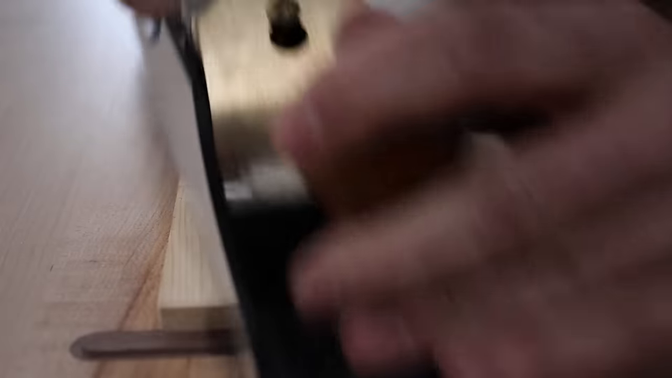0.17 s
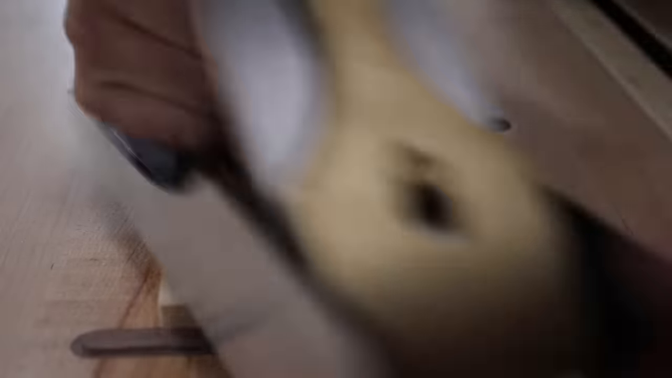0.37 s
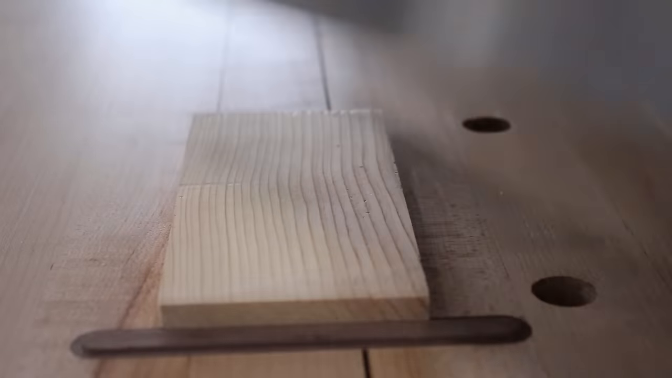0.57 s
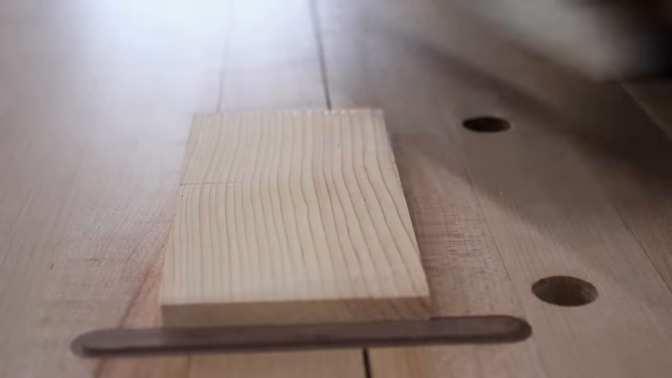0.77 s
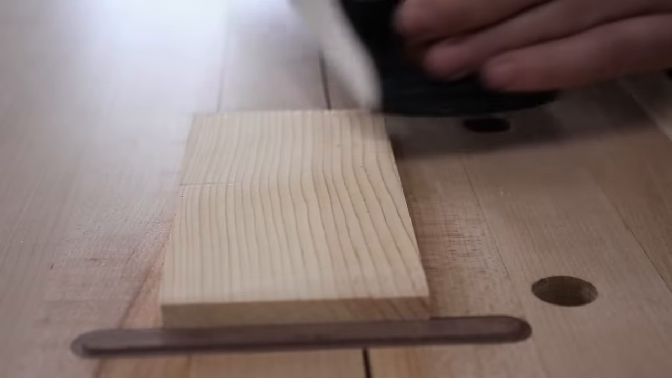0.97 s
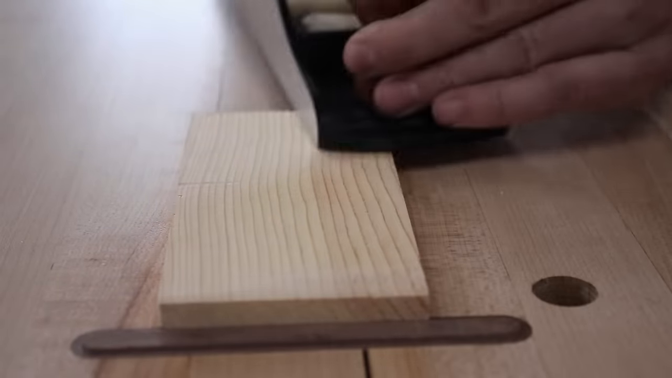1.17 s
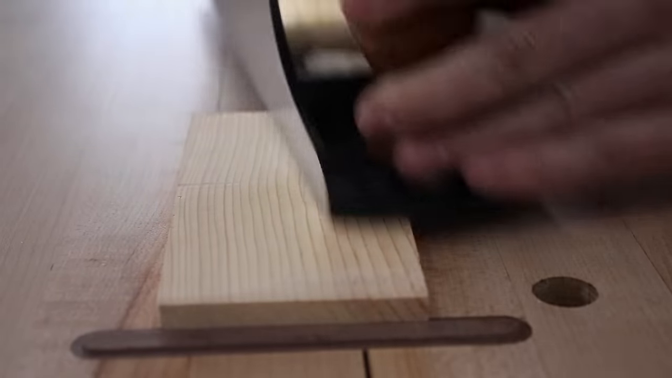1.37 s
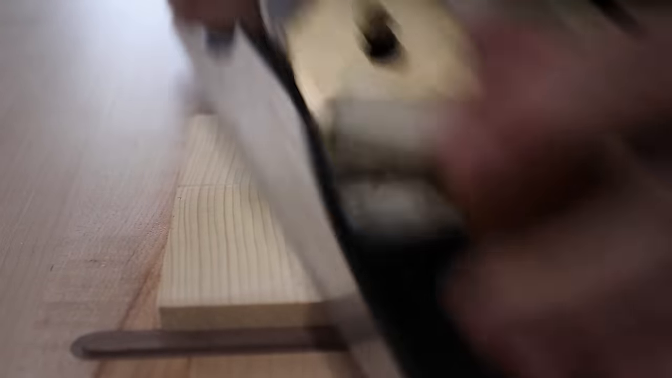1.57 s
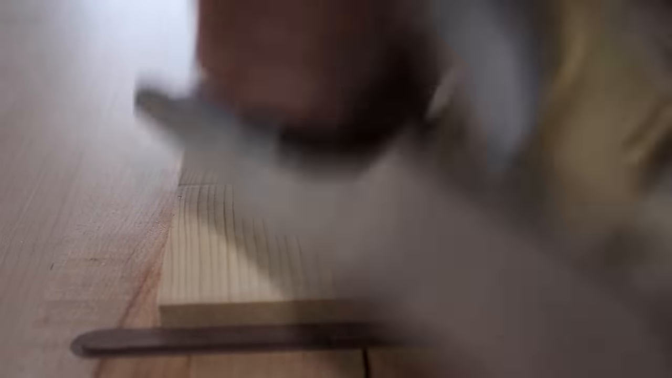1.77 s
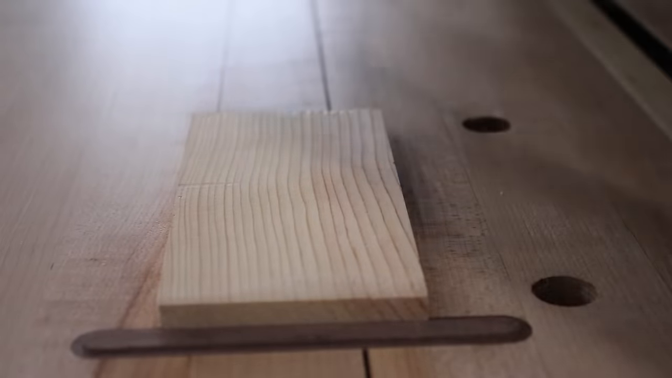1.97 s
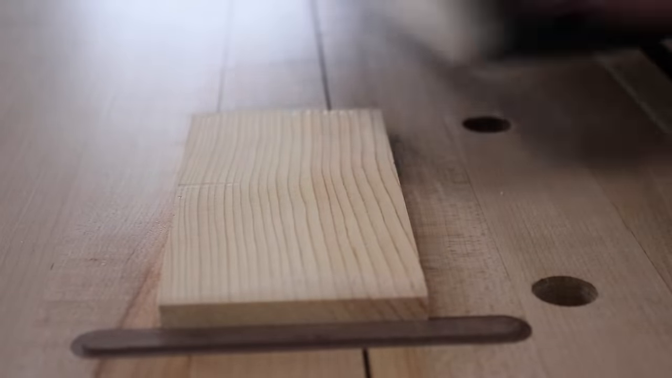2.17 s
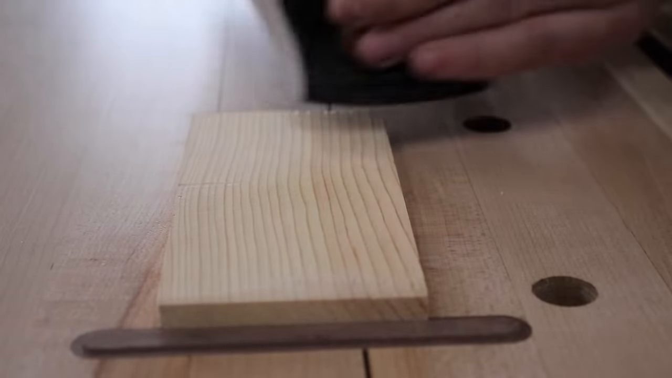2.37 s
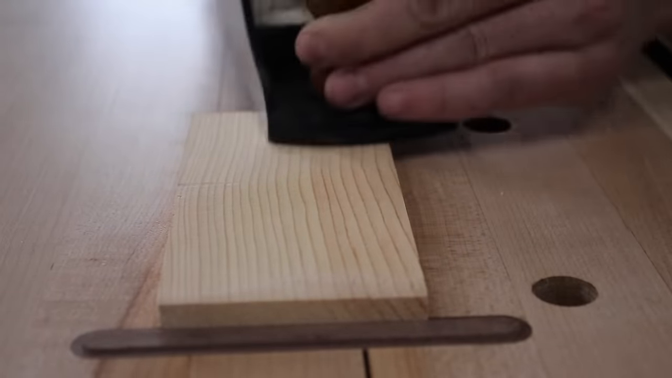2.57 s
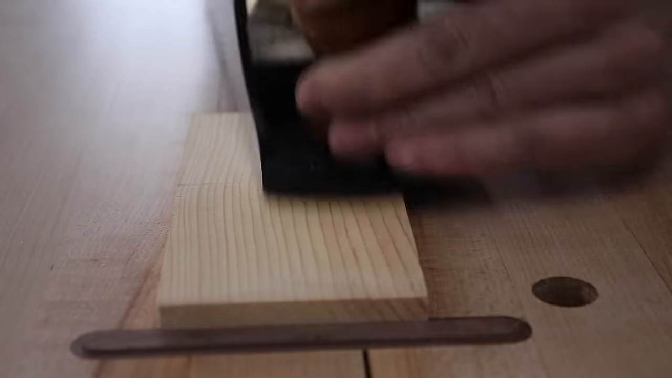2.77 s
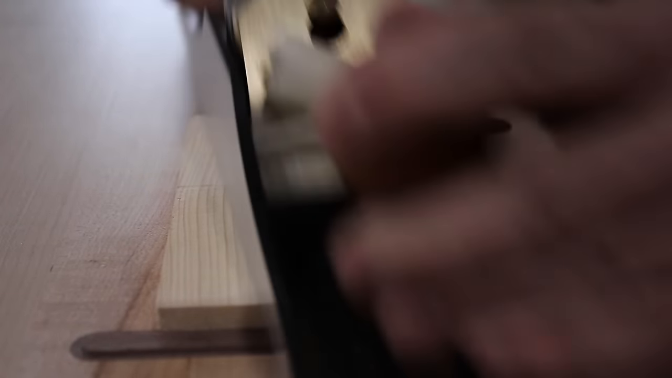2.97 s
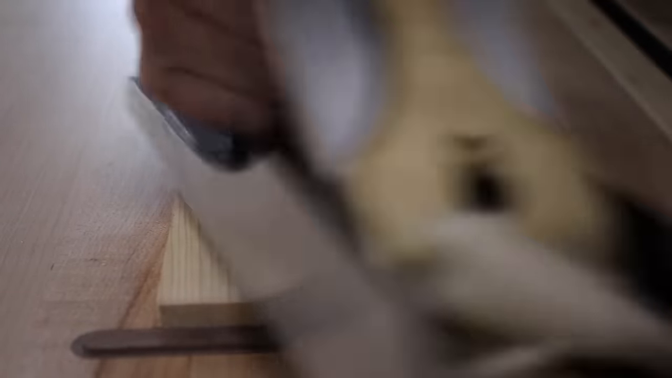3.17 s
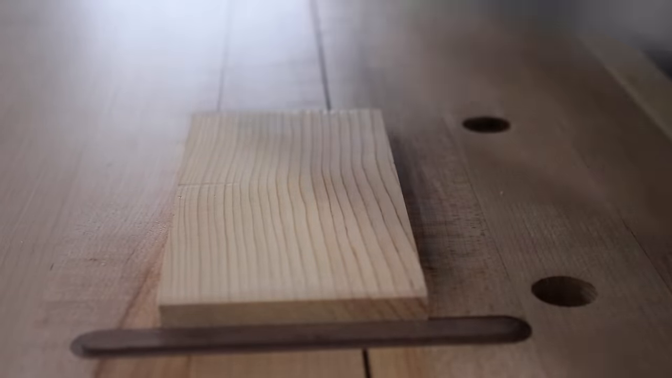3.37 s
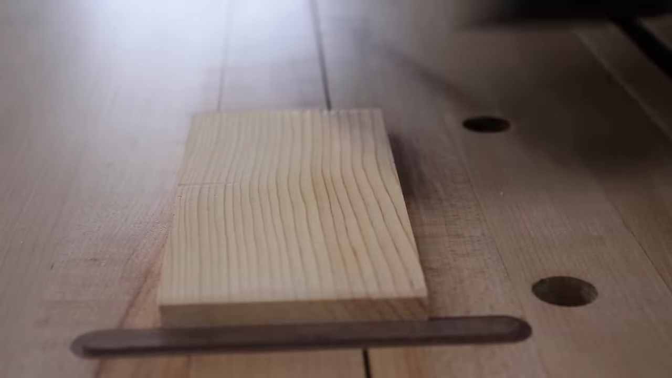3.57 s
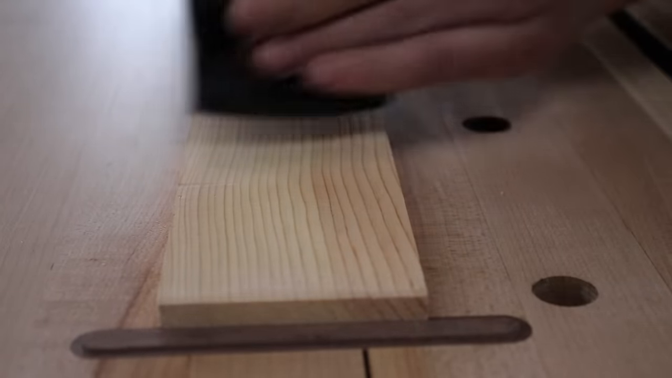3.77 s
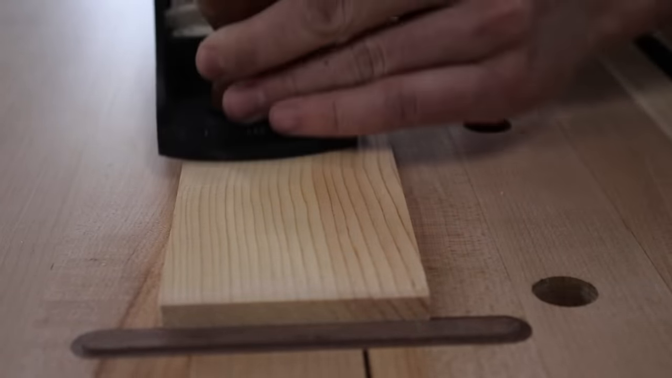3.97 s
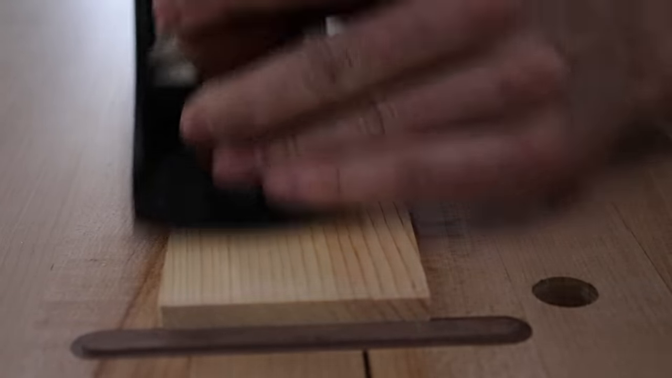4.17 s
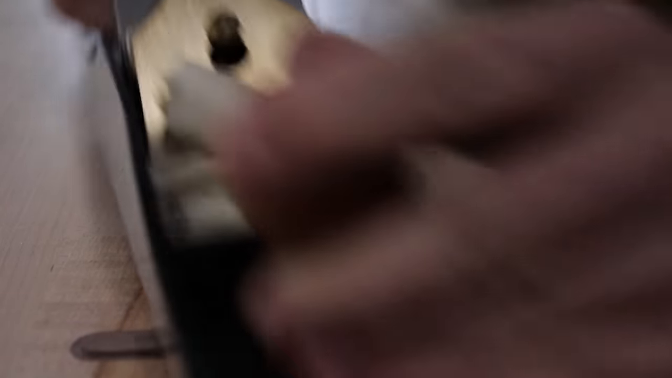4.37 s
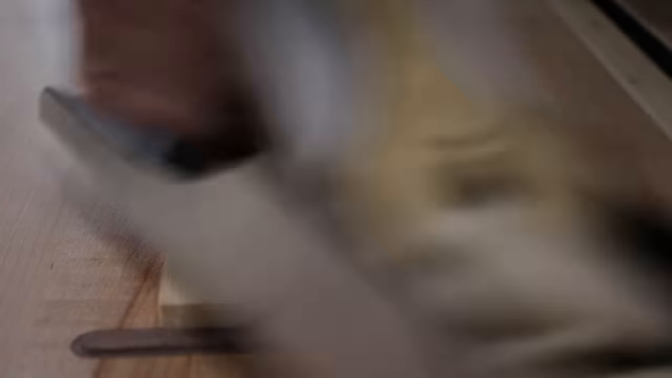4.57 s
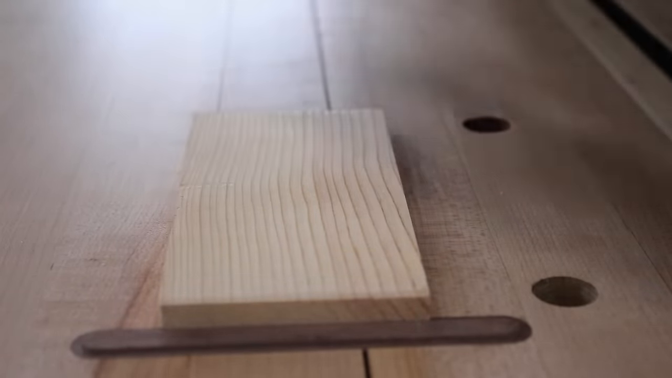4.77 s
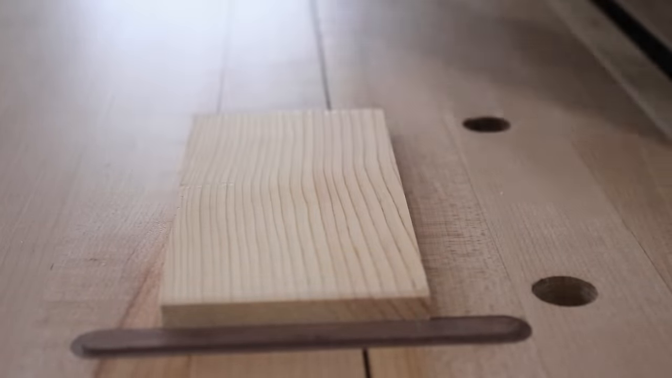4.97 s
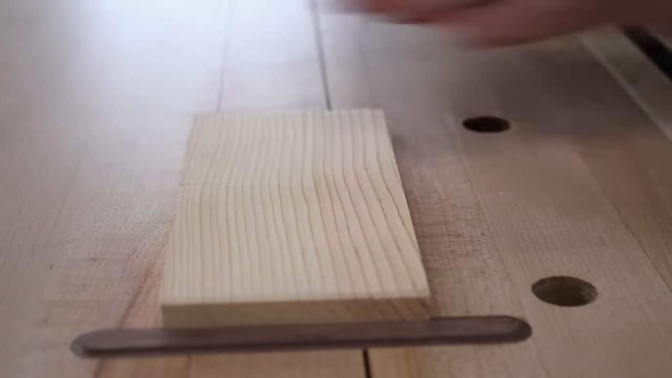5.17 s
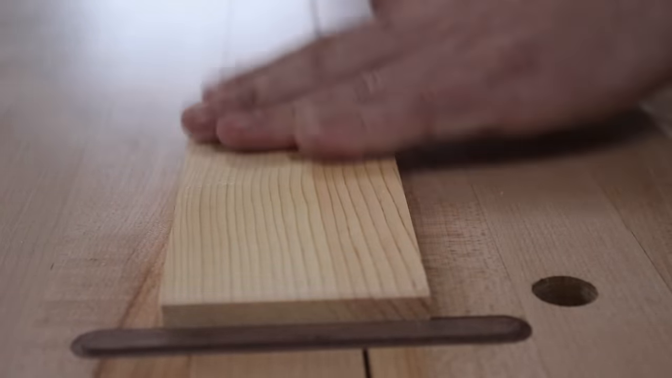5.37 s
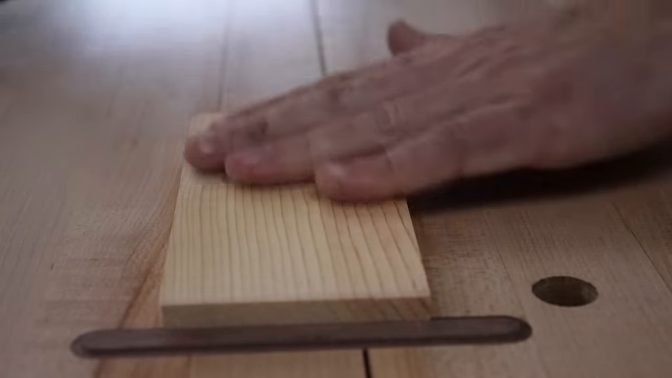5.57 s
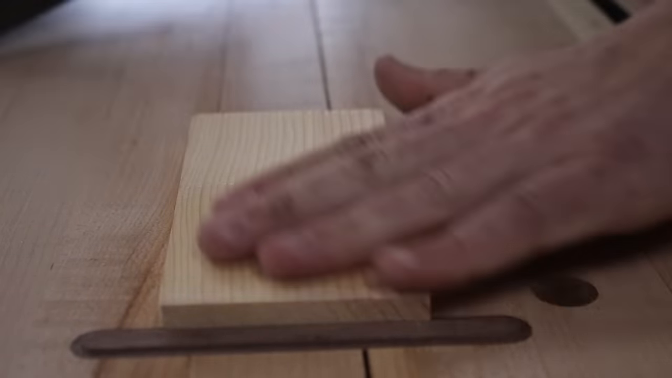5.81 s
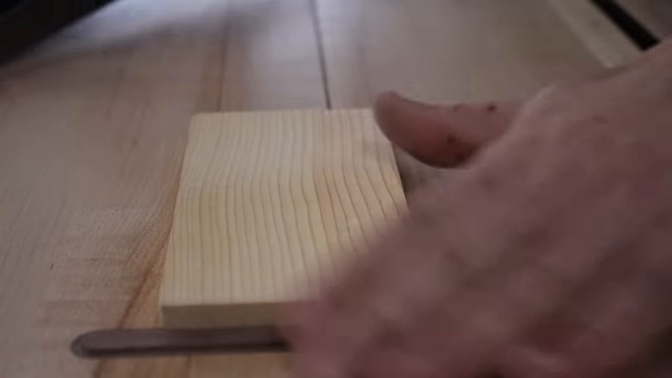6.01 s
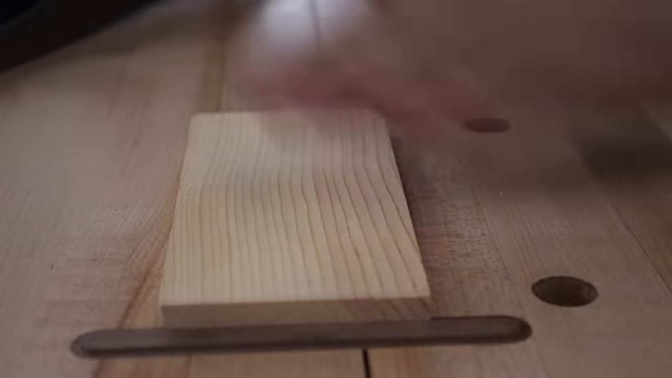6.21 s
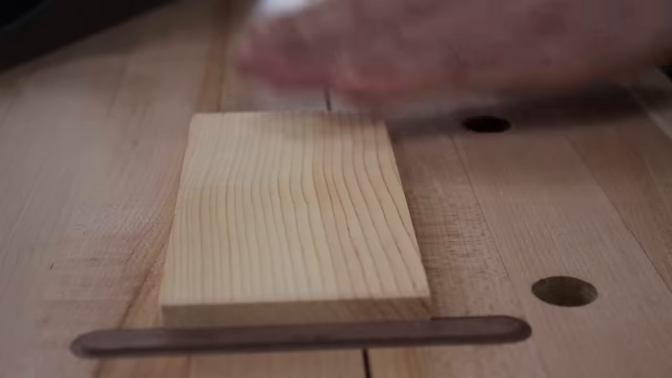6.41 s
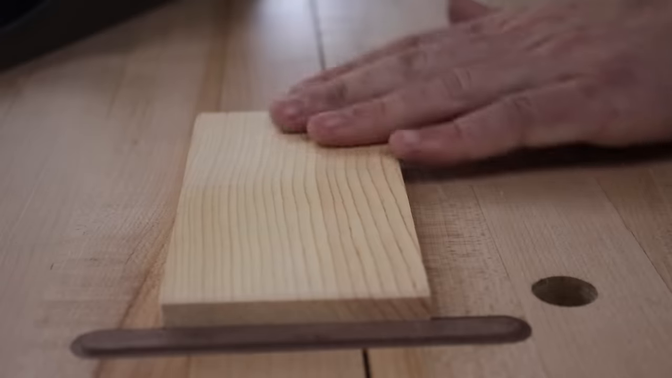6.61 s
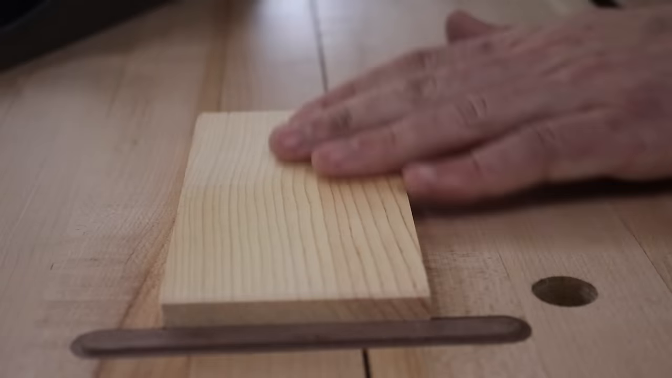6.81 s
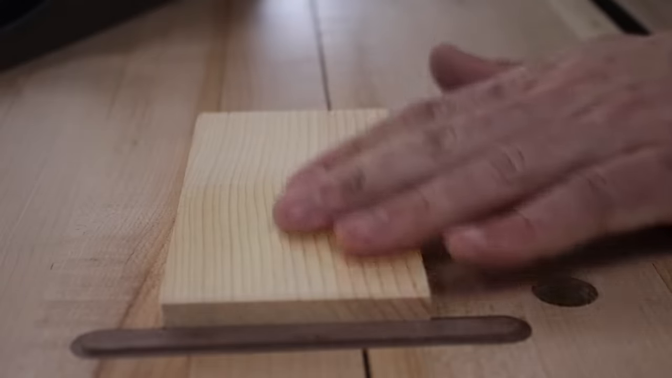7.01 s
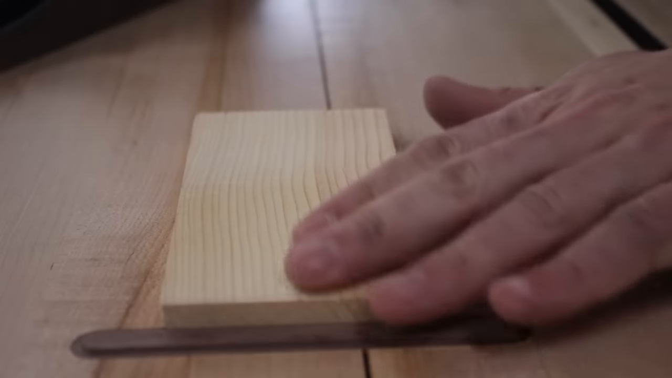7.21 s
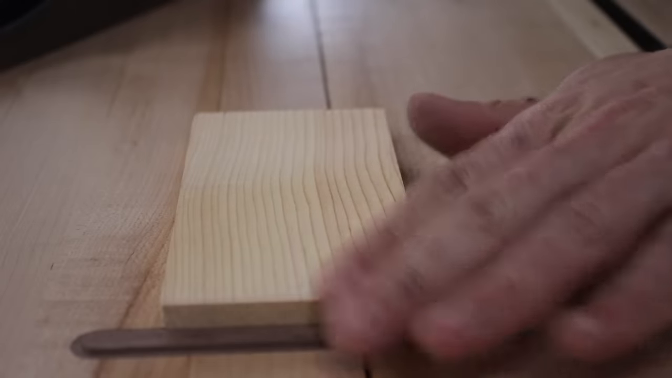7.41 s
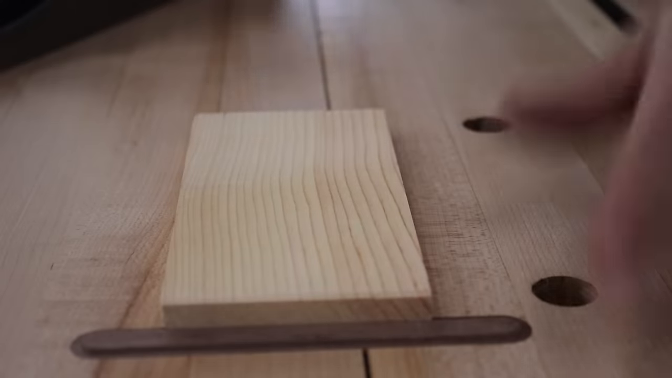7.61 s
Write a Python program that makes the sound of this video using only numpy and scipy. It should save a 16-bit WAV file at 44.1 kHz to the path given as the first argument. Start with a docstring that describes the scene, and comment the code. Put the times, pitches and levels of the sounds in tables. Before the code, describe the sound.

In a quiet workshop, heard close to the bench, a hand plane begins a light stroke over a small board almost at once, a crisp tearing hiss with a metallic ring until about 0.35 s, fading as the sole slides off. At 1.2 s the plane is set down with a firm, bright wooden knock, scuffs faintly, and cuts again from 1.45 to 1.7 s. A softer double knock at 2.6 s leads to the third, sharply starting stroke at 2.9-3.13 s. A clicky knock at 3.95 s precedes the last stroke, 4.25-4.5 s, with a small knock inside it. Near-silence follows, with faint cloth rustle. From 5.4 to 6.1 s a palm softly brushes the wood, with dull taps around 5.9 s and another at 6.34 s. A fainter second wipe runs from 6.5 to 7.57 s. Low room rumble, faint wavering hums and light hiss continue underneath.

```python
"""A quiet workshop, heard close to the bench: a hand plane takes four light strokes over a small board.
Before each later stroke it is set down with a knock and scuffs faintly; after each the sole slides off.
Then a palm wipes the smooth face and the bench is tapped, amid cloth rustle, faint low hums and room noise.
Friction is clumped noise shaped by bands and resonances; blows are short pulses that ring damped modes."""
import sys
import numpy as np
from scipy import signal
from scipy.fft import rfft, irfft
from scipy.io import wavfile
from scipy.ndimage import uniform_filter1d

SR = 44100
rng = np.random.default_rng(int(sys.argv[2]) if len(sys.argv) > 2 else 0)


def unload_audio(sound):
    """Save the sound as a 16-bit wav file, at the path given as the first command line argument."""
    columns = np.transpose(np.atleast_2d(sound))
    # keep every value between -1 and 1, then stretch to whole-number steps
    steps = np.round(np.clip(columns, -1, 1) * 32767)
    wavfile.write(sys.argv[1], SR, steps.astype(np.int16))


N = 337365  # samples in the scene


def gain_of(db):
    """The decibel law: 20 dB is a tenfold amplitude."""
    return 10 ** (np.asarray(db) / 20)


def evened(x):
    """Normalises to an effective (RMS) value of 1."""
    return x / np.sqrt(np.mean(x ** 2) + 1e-20)


def read(points, hz):
    """Reads a spectrum curve, interpolated over logarithmic frequency."""
    point_hz, value = np.transpose(points)
    return np.interp(np.log(hz + 1), np.log(point_hz + 1), value)


def add(mix, s, sound):
    """Superposition: adds a sound to the mix from time s on."""
    part = mix[round(s * SR):][:len(sound)]
    part += sound[:len(part)]


def coloured(x, gain):
    """Linear filtering: multiplies the spectrum by gain(Hz)."""
    return irfft(rfft(x) * gain(np.fft.rfftfreq(len(x), 1 / SR)), len(x))


def between(hz, lo, hi):
    """Gain of a band-pass with soft edges."""
    return 1 / np.sqrt((1 + (lo / (hz + 1)) ** 12) * (1 + (hz / hi) ** 12))


def resonate(x, hz, width):
    """Resonance of gain 1 by heterodyning: shifts hz down to zero, smooths, and shifts back."""
    turn = np.exp(2j * np.pi * np.cumsum(hz * np.ones(len(x))) / SR)
    r = np.exp(-np.pi * width / SR)
    return 2 * (turn * signal.lfilter([1 - r], [1, -r], x / turn)).real


def played(rows):
    """Envelopes by linear interpolation: returns the start time and every further column as a curve."""
    s, *columns = np.transpose(rows)
    t = np.arange(s[0], s[-1], 1 / SR)
    return s[0], [np.interp(t, s, column) for column in columns]


def grit(size, spread_db, lump_db, lump_s):
    """Dry friction as a random process: dense tiny slips of uneven size that come in clumps."""
    lumps = evened(uniform_filter1d(rng.standard_normal(size), max(round(lump_s * SR), 1)))
    sizes_db = spread_db * np.minimum(rng.exponential(1, size), 4)
    return evened(rng.standard_normal(size) * gain_of(sizes_db + lump_db * lumps))


def mottled(x, depth_db):
    """Narrow resonances come and go with the grain of the wood: random gains over time and pitch."""
    z = signal.stft(x, nperseg=512, noverlap=384)[2]
    streaks = uniform_filter1d(uniform_filter1d(rng.standard_normal(z.T.shape), 9, 0), 3, 1)
    z = z * gain_of(depth_db * evened(streaks).T)
    return signal.istft(z, nperseg=512, noverlap=384)[1][:len(x)]


def cut(stroke):
    """Forced vibration: fibres tear at the edge and ring the iron, the curling shaving, board and bench."""
    # torn fibres: hz [Hz], density_db [dB per Hz]
    tear = [(80, -32.5), (173, -8), (640, -24), (1160, -20.5), (1900, -25), (2560, -10), (2900, -8.5),
            (3400, 1.5), (4450, 0), (6600, 0.5), (8000, -4), (10200, -8.5), (11200, -16), (13000, -16),
            (15700, -31.5)]
    rows, pitches, fizz_db = stroke
    s, (ring_db, hiss_db, board_db) = played(rows)
    t = np.arange(len(ring_db)) / SR
    along = t / t[-1]
    bite_db = -25 * np.clip(1 - t / 0.022, 0, 1)  # the edge takes 22 ms to bite
    # fine fizz grows along the stroke and partly follows the hiss
    fizz_db = fizz_db + 4 * along + 0.36 * (hiss_db - hiss_db.mean()) + bite_db
    # the low board follows the upper board only in part
    low_db = -55.5 + 0.38 * (board_db - board_db.mean()) + bite_db
    bench_db = -65 + 13 * along  # the rumble grows along the stroke
    fibres = grit(len(t), spread_db=2.5, lump_db=-1.02, lump_s=0.011)
    wide = coloured(fibres, lambda hz: gain_of(read(tear, hz)))
    voice = mottled(evened(wide) + gain_of(-5) * iron(fibres), depth_db=3.5)
    # level [dB], lower and upper band edge [Hz]
    parts = [(ring_db, 2600, 4500), (hiss_db, 4500, 9000), (board_db, 1800, 2600),
             (low_db, 900, 1800), (fizz_db, 9000, 17000), (bench_db, 90, 800)]
    mix = 0
    for db, lo, hi in parts:
        band = coloured(voice, lambda hz: between(hz, lo, hi))
        mix = mix + gain_of(db) * evened(band)
    curl_hz, curl_width_hz = np.interp(s + t, *np.transpose(pitches)), 700
    curl = resonate(resonate(fibres, curl_hz, curl_width_hz), curl_hz, curl_width_hz)
    curl_gain = gain_of(-7) * np.hypot(gain_of(ring_db), gain_of(hiss_db))  # relative to ring and hiss
    mix = mix + curl_gain * evened(mottled(curl, depth_db=6))
    return s, mix * np.clip(t / 0.0025, 0, 1) * np.clip(t[::-1] / 0.04, 0, 1)


def iron(x):
    """Modal superposition: the resonances of the blade and the plane body."""
    # modes of the iron: mode_hz [Hz], width_hz [Hz], level_db [dB]
    modes = [(1220, 38, -22.5), (1380, 33, -26), (1778, 40, -27), (2115, 44, -8.5), (2590, 74, -7),
             (3076, 140, 4.5), (3276, 110, 0), (3650, 23, -3), (4040, 63, -9), (5400, 92, -3),
             (6430, 140, 2.5), (7640, 280, -7), (8293, 51, -12)]
    return evened(sum(gain_of(db) * evened(resonate(x, hz, width)) for hz, width, db in modes))


def slide(row):
    """Sliding friction: the sole hisses over wood, the bench rumbles; on lifting the hiss dulls and dies."""
    # hiss of the sole: hz [Hz], density_db [dB per Hz]
    sole = [(590, -32.5), (1000, 2), (1260, 3), (1410, 1.5), (2210, -3.5), (3510, 2.5), (5680, -1),
            (7070, 1.5), (15600, -9.5)]
    s, contact_s, start_db, treble_db, bench_db = row
    after_s = 0.18  # the sound outlasts the contact
    t = np.arange(0, contact_s + after_s, 1 / SR)
    lifted_s = np.maximum(t - contact_s, 0)
    lift = np.minimum(lifted_s / 0.018, 1)
    sag_db = 42 * (t - lifted_s)  # 42 dB per s while in contact
    level_db = start_db - sag_db - 4 * lift - 13 * lifted_s
    rub = grit(len(t), spread_db=2.5, lump_db=.6, lump_s=.004)
    hiss = evened(coloured(rub, lambda hz: gain_of(read(sole, hz))))
    dull = coloured(hiss, lambda hz: 1 / (1 + (hz / 5200) ** 6))
    hiss = dull + gain_of(treble_db - 11 * lift) * (hiss - dull)
    bench = evened(coloured(rub, lambda hz: between(hz, 110, 600)))
    fade = np.clip(t / .008, 0, 1) * np.clip(t[::-1] / .12, 0, 1)
    return s, (gain_of(level_db) * hiss + gain_of(bench_db - 25 * t) * bench) * fade


def creep(row):
    """Light friction, partly through the iron: a dry scuff brightens and swells at its end."""
    s, landing, end, settle_db, creep_db, treble_db, swell_db = row
    t = np.arange(0, end - s, 1 / SR)
    swell = gain_of(swell_db * np.clip(1 - t[::-1] / .014, 0, 1))  # over the last 14 ms
    rub = grit(len(t), spread_db=-3.5, lump_db=2.6, lump_s=0.0025)
    scuff = mottled(rub + gain_of(-8) * iron(rub), depth_db=1.5)
    low = evened(coloured(scuff, lambda hz: between(hz, 1300, 3400)))
    high = evened(coloured(scuff, lambda hz: between(hz, 4300, 28000)))
    settle = gain_of(settle_db - 500 * abs(s + t - landing))  # 500 dB per s to and from the landing
    brighten = gain_of(treble_db - 17.5 * (1 - t / t[-1]))
    low = low * (settle + gain_of(creep_db))
    high = high * (settle * gain_of(-24.5) + brighten)
    return s, (low + high) * swell * signal.windows.tukey(len(rub), .03)


def contacts():
    """Contact time sets pitch: each knock is a tick with a thud just behind it; further ticks have no thud."""
    # plane and hand knocks: start_s [s], thud_db [dB], thud_hz [Hz], thud_cycles [cycles],
    # tick_db [dB], tick_hz [Hz]
    knock_rows = [(.452, -48.5, 260, 3, -48, 805), (1.1871, -27, 766, 1.5, -26.5, 2644),
                  (1.189, -33, 270, 2.3, -60, 2000), (1.1971, -29, 1040, 1.4, -38.5, 2470),
                  (1.2159, -33, 216, 1.4, -56, 1500), (1.662, -47, 256, 4, -59, 1000),
                  (2.606, -45, 580, 1.5, -43, 1910), (2.6098, -51, 500, 1.5, -46, 2950),
                  (2.615, -33.5, 650, 1.3, -49.5, 1400), (2.630, -38, 261, 1.6, -60.5, 2000),
                  (2.653, -37.5, 232, 1.6, -67, 2000), (2.940, -43, 550, 2.2, -60.5, 1100),
                  (3.954, -38, 320, 1.2, -25.5, 2050), (3.969, -43.5, 320, 1.5, -35, 1000),
                  (3.982, -38, 240, 2.5, -51, 1000), (5.898, -28, 480, 3, -42, 1110),
                  (5.914, -37, 477, 3, -70, 1090), (5.943, -29, 470, 2.2, -49.5, 1100),
                  (6.3425, -30, 430, 1.43, -49.5, 1080), (6.356, -50.5, 433, 3, -60.5, 1080)]
    # further ticks, mostly alone, some within a knock: start_s [s], level_db [dB], pitch_hz [Hz],
    # length [cycles]
    further_ticks = [(0.047, -43, 7476, 15), (0.785, -56.5, 2050, 4), (1.17, -46, 2230, 1.4),
                     (1.791, -53, 987, 3.2), (2.085, -55.5, 1600, 3.5), (2.587, -54, 3250, 9),
                     (3.294, -73, 7160, 3.3), (4.247, -42.5, 3136, 8), (4.384, -34, 900, 1.65),
                     (4.595, -37.5, 4050, 1.5), (4.91, -59.5, 1103, 8), (5.897, -56, 3410, 13),
                     (7.51, -64, 1800, 3), (7.56, -59.5, 1395, 3)]
    thuds, ticks = [], []
    for s, thud_db, thud_hz, thud_cycles, tick_db, tick_hz in knock_rows:
        thuds.append((s + .0007, thud_db, thud_hz, thud_cycles))
        tick_cycles = 3.2 * (1000 / tick_hz) ** .6  # higher ticks are shorter
        ticks.append((s, tick_db, tick_hz, tick_cycles))
    ticks = ticks + further_ticks
    # every tick has a weaker, higher partial, 3.5 cycles long
    partials = [(s, db - 12.5, hz * 1.7, 3.5) for s, db, hz, _ in ticks]
    return thuds + ticks + partials


def knocks():
    """Impulse response: pulses of a few cycles under a bell ring the wood, snap and set off a short rattle."""
    # modes of board, bench top and plane body: mode_hz [Hz], level_db [dB], t60_s [s]
    wood = [(124, 1.5, 0.14), (203, 6, 0.18), (278, 1, 0.22), (316, 3.5, 0.16), (338, -7, 0.064),
            (472, -1, 0.45), (541, -4, 0.023), (673, 4, 0.086), (846, -7, 0.027), (1070, 0, 0.13),
            (1264, -11.5, 0.018), (1610, -6, 0.067), (1920, 0.5, 0.09), (2170, -1, 0.047),
            (2616, -6.5, .02), (3030, -1, 0.049), (3120, -7, 0.022)]
    # hz [Hz], gain_db [dB]
    snap_curve = [(600, -21), (1200, 4.5), (3600, -2), (6800, -14.0), (8500, -21), (16000, -47.5)]
    blows, pushes, snaps = np.zeros(N), np.zeros(N), np.zeros(N)
    t = np.arange(-800, 800) / SR
    for s, peak_db, hz, cycles in contacts():
        bell = gain_of(peak_db) * np.exp(-.5 * (t * hz * 3 / cycles) ** 2)
        add(blows, s + t[0], -bell * np.cos(2 * np.pi * hz * t))
        # the slow shove of the blow reaches the low modes
        add(pushes, s + t[0], np.gradient(bell) * SR / hz)
        hardness = min(hz / 2500, 1)  # harder contact, more snap
        burst = gain_of(peak_db - 60 * abs(t) / 0.005) * (t > -.25 / hz)
        add(snaps, s + t[0], burst * hardness)
    drive = blows + gain_of(-5.5) * pushes
    ring = 0
    for k, (hz, db, t60) in enumerate(wood):
        ring = ring + (-1) ** k * gain_of(db) * resonate(drive, hz, 1.5 / t60)
    snap = coloured(snaps * rng.standard_normal(N), lambda hz: gain_of(read(snap_curve, hz)))
    rattle_t = np.arange(SR // 8) / SR
    rattle = grit(len(rattle_t), spread_db=4.0, lump_db=6.0, lump_s=0.00067)
    rattle = rattle * gain_of(-60 * rattle_t / 0.09)
    shaken = signal.oaconvolve(blows, rattle / np.linalg.norm(rattle))[:N]
    mix = blows + gain_of(-1.5) * ring + gain_of(-9) * shaken + gain_of(-16) * snap
    return coloured(mix, lambda hz: between(hz, 68, SR))  # the knocks carry no deep bass


def wipe(rows):
    """Skin friction and cavity resonance: soft noise on wood, lifted in hollows under palm and fingers."""
    # fixed hollows between skin and wood: centre_hz [Hz], width_hz [Hz]
    palm = [(5300, 1500), (11600, 3600)]
    # skin on wood: hz [Hz], density_db [dB per Hz]
    brush = [(1200, -38), (2500, -11), (4000, -6), (8000, 10.5), (12000, -6), (15700, -39)]
    s, (low_db, level_db, high_db) = played(rows)
    rub = grit(len(level_db), spread_db=0.0, lump_db=0.8, lump_s=0.011)
    low, high = (evened(resonate(resonate(rub, hz, width), hz, width)) for hz, width in palm)
    finger = evened(resonate(resonate(rub, 9380, 1900), 9380, 1900))
    wide = evened(coloured(rub, lambda hz: gain_of(read(brush, hz))))
    middle = finger + gain_of(-4) * wide
    mix = gain_of(low_db) * low + gain_of(level_db) * middle + gain_of(high_db) * high
    return s, mottled(mix, depth_db=-1.1) * signal.windows.tukey(len(rub), .1)


def sleeve(row):
    """Textile friction: cloth and hands rustle faintly as the arms move."""
    # cloth rustle: hz [Hz], density_db [dB per Hz]
    cloth = [(710, -32.5), (1200, 0), (1850, -7), (2710, -3.5), (6440, -9.5), (10900, -15.5), (15000, -17)]
    start, loudest, end, db = row
    edge_db = db - 13.5
    s, (level_db,) = played([(start, edge_db), (loudest, db), (end, edge_db)])
    rub = grit(len(level_db), spread_db=2.6, lump_db=0.7, lump_s=.01)
    rustle = evened(coloured(rub, lambda hz: gain_of(read(cloth, hz))))
    return s, gain_of(level_db) * rustle * signal.windows.tukey(len(rub), .3)


def drone(row):
    """Harmonic tone with random amplitude modulation: a wavering low hum and its weaker octave."""
    s, length, first_hz, last_hz, level_db = row
    waver_db, waver_size = 3.5, round(0.036 * SR)
    hz = np.linspace(first_hz, last_hz, round(length * SR))
    waver = uniform_filter1d(rng.standard_normal(len(hz)), waver_size)
    waver = evened(uniform_filter1d(waver, waver_size))
    waver = evened(waver - waver.mean())
    turn = 2 * np.pi * np.cumsum(hz) / SR
    tone = np.sin(turn) + gain_of(-7.0) * np.sin(2 * turn)
    swell = signal.windows.hann(len(hz)) ** .6
    return s, np.sqrt(2) * gain_of(level_db + waver_db * waver) * tone * swell


def shop(x):
    """Reverberation: sparse taps of random sign, each band decaying exponentially at its own speed."""
    # decay of the room: hz [Hz], t60_s [s]
    decay_times = [(100, 1), (260, 0.68), (700, 0.14), (1840, 0.068), (4850, 0.11), (12000, 0.17)]
    # hz [Hz], reverberation level [dB]
    wet_curve = [(150, -11), (300, -15.0), (600, -21.0), (1100, -18.5), (2000, -26), (5000, -24.5),
                 (12000, -34.0)]
    taps, at = np.zeros(SR), np.arange(300, SR - 20, 20)
    taps[at + rng.integers(0, 20, len(at))] = rng.choice([-1., 1.], len(at))
    hz, t, z = signal.stft(taps, SR, nperseg=512)
    wet_db = read(wet_curve, hz)[:, None]
    decay = gain_of(-60 * t / read(decay_times, hz)[:, None])
    decay /= np.sqrt((decay ** 2).mean(axis=1, keepdims=True) * len(at))
    tail = signal.istft(z * decay * gain_of(wet_db), SR, nperseg=512)[1]
    return signal.fftconvolve(x, tail * np.sqrt(20))[:N]


def air():
    """Stationary noise with slow fluctuation: room rumble and microphone hiss, drifting in patches."""
    # background spectrum: hz [Hz], density_db [dB per Hz]
    background = [(15, -49), (25, -25), (60, -10), (125, -1), (204, 2.5), (250, 0), (290, -0.5), (341, -6),
                  (480, -6.5), (1300, -18.5), (1760, -23), (3860, -26), (7560, -32), (12300, -35),
                  (14400, -33), (15600, -51.5)]
    frames, hz = N // 512 + 5, np.fft.rfftfreq(2048, 1 / SR)
    a, b, patches = rng.standard_normal((frames, len(hz), 3)).T
    patches = evened(uniform_filter1d(uniform_filter1d(patches, 4, 0), 8, 1))
    depth_db = read([(60, 3.8), (400, 1.5), (3000, .8)], hz)[:, None]
    z = (a + 1j * b) * gain_of(read(background, hz)[:, None] + depth_db * patches)
    noise = signal.istft(z, nperseg=2048, noverlap=1536)[1][:N]
    return gain_of(-66.5) * evened(noise)


def scene():
    """Superposition of all sources at the bench, their reverberation and the background."""
    # one table a cut: start_s [s], iron_ring_db [dB], shear_hiss_db [dB], board_db [dB]
    cuts = [
        [(0.042, -65, -51.5, -74), (0.072, -49.5, -48, -56), (0.1, -42.5, -34.5, -36.5),
         (0.148, -43, -39.5, -39), (0.206, -43.5, -29, -45), (0.242, -34, -28.5, -51.5),
         (0.292, -32, -34, -32.5), (0.335, -46, -49, -40.5)],
        [(1.435, -75, -61.5, -97.5), (1.457, -38.5, -34, -57), (1.507, -41.5, -48, -48.5),
         (1.535, -30.5, -36, -44.5), (1.591, -48, -29.5, -55), (1.657, -32, -36, -57), (1.69, -49, -48, -39)],
        [(2.875, -61.5, -62, -83), (2.891, -26, -34, -45.5), (2.945, -32.5, -44, -29.5),
         (2.983, -30, -40.5, -46.5), (3.019, -44, -33, -45.5), (3.073, -28, -34.5, -62),
         (3.135, -46.5, -48, -43)],
        [(4.248, -67, -50.5, -68.5), (4.254, -46.5, -41.5, -44.5), (4.318, -39.5, -56.5, -53),
         (4.368, -43, -36.5, -54), (4.404, -49.5, -26, -51), (4.476, -34, -47.5, -62.5),
         (4.525, -55.5, -41, -37)],
    ]
    # pitch of the curling shaving, one table a cut: start_s [s], pitch_hz [Hz]
    curls = [
        [(0.06, 3100), (0.12, 3050), (0.194, 3910), (0.228, 3560), (0.292, 3670), (0.33, 3370)],
        [(1.445, 3890), (1.525, 3320), (1.601, 4630), (1.631, 4070), (1.685, 3690)],
        [(2.885, 3200), (2.943, 3050), (3.003, 3390), (3.021, 3880), (3.069, 3630), (3.13, 3850)],
        [(4.25, 3020), (4.32, 3210), (4.364, 5140), (4.386, 5350), (4.43, 5190), (4.474, 3830), (4.52, 3640)],
    ]
    # base level of the fine fizz, one for each cut: level_db [dB]
    fizz_levels = [-50, -50.5, -49.5, -49]
    # the sole slides off the board: start_s [s], contact_s until it lifts [s], start_db [dB],
    # treble_db relative to it [dB], bench_rumble_db at the start [dB]
    slides = [(0.324, 0.11, -56.5, 2, -58), (1.68, .1, -57.5, -2.5, -61.5),
              (3.125, 0.097, -55.5, -2.5, -58.5), (4.515, 0.1, -56.5, 4, -58)]
    # the sole settles and creeps, ending around the start of the cut: touch_s [s], landing_s [s],
    # end_s [s], settling_db [dB], creeping_db [dB], treble_db at the end before the swell [dB],
    # swell_db [dB]
    creeps = [(1.168, 1.189, 1.5, -61.5, -73, -70, 6), (2.582, 2.607, 2.885, -49, -73, -69, 23.5),
              (3.95, 3.953, 4.249, -55.5, -77.5, -70, 22.5)]
    # palm on the board: start_s [s], lower_hollow_db [dB], finger_db [dB], upper_hollow_db [dB]
    wipes = [
        [(5.42, -91.5, -92, -100), (5.584, -81, -75, -88), (5.638, -80, -75, -82), (5.69, -77, -62.5, -86),
         (5.762, -72.5, -74, -81), (5.908, -79, -76, -83.5), (6.036, -76, -71, -86), (6.11, -76, -74, -86),
         (6.14, -95, -88, -93)],
        [(6.5, -106, -100, -97), (6.542, -86, -82, -89), (6.636, -91.5, -86, -97), (6.7, -88, -94, -98)],
        [(6.72, -92, -91, -97), (6.794, -85, -74.5, -85), (6.854, -87, -74, -82), (6.95, -82, -74.5, -77),
         (7.058, -85, -76.5, -74), (7.226, -90, -82, -81), (7.418, -87.5, -82, -93), (7.508, -78, -73, -89),
         (7.57, -92.5, -87, -98)],
    ]
    # moving cloth: start_s [s], loudest_s [s], end_s [s], level_db at the loudest [dB]
    sleeves = [(0, 0.021, .06, -64), (1.997, 2.274, 2.5, -72.5), (4.849, 5.203, 5.45, -75.5),
               (5.783, 6.09, 6.55, -72)]
    # faint low hums: start_s [s], length_s [s], first_hz [Hz], last_hz [Hz], level_db [dB]
    drones = [(1.25, .3, 123.3, 124.2, -68.5), (1.65, .38, 130.6, 133, -73), (2.12, .42, 76.8, 75.2, -72),
              (2.9, .6, 93.9, 88.8, -68.5), (3.38, 0.43, 180.5, 195, -70), (4.4, 0.53, 71.7, 73.4, -71.5),
              (5.36, 0.283, 123.2, 108, -70.5), (5.984, 0.18, 119, 120.6, -66)]
    bench = knocks()
    sources = [(cut, zip(cuts, curls, fizz_levels)), (slide, slides), (creep, creeps),
               (wipe, wipes), (sleeve, sleeves), (drone, drones)]
    for play, events in sources:
        for event in events:
            add(bench, *play(event))
    return (bench + shop(bench) + air())[None]


def record(dry):
    """Band limitation: the microphone drops the deepest bass, then a low-pass cuts at 15.8 kHz."""
    thin = signal.sosfilt(signal.butter(2, 50, "high", fs=SR, output="sos"), dry)
    low_pass = signal.firwin(1023, 15800, window=("kaiser", 9), fs=SR)
    return signal.oaconvolve(thin, low_pass[None], "same")


dry = scene()
out = record(dry)
unload_audio(out)
```